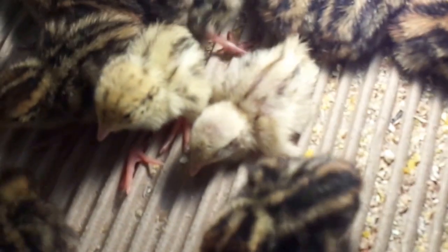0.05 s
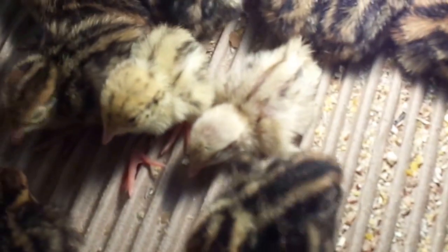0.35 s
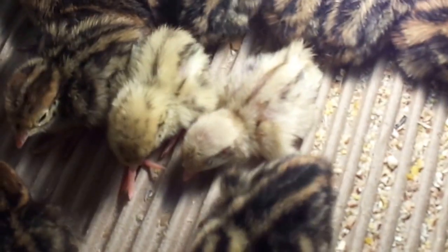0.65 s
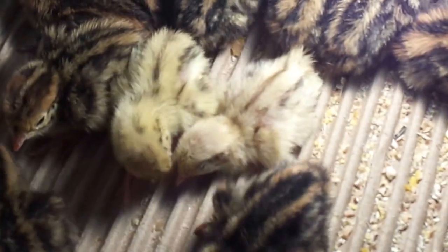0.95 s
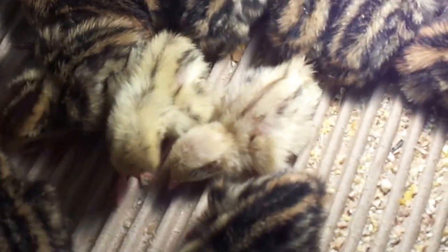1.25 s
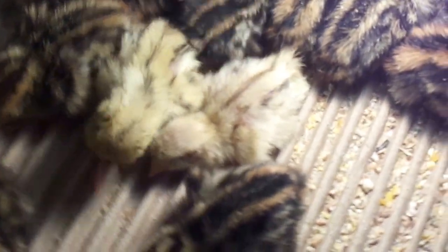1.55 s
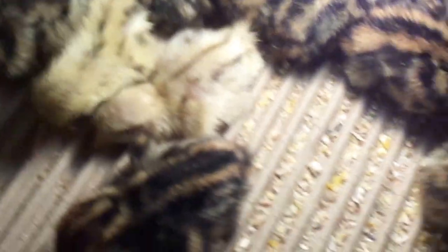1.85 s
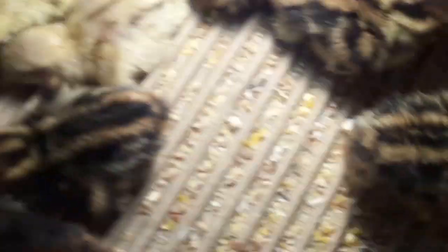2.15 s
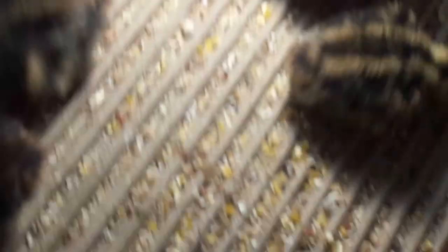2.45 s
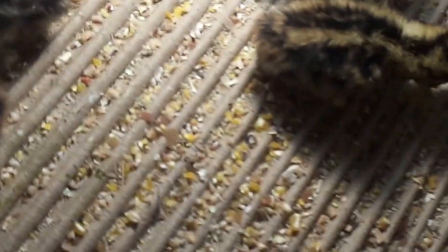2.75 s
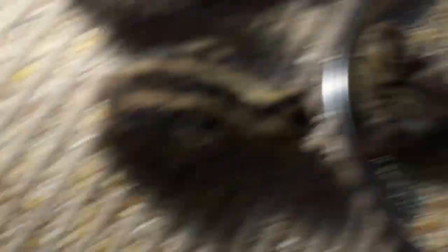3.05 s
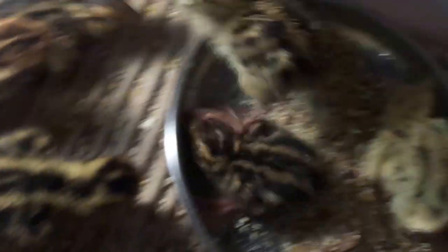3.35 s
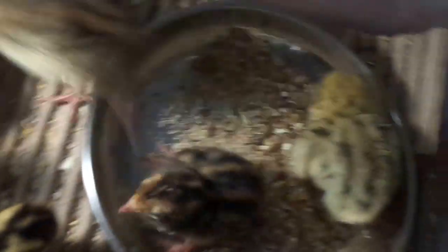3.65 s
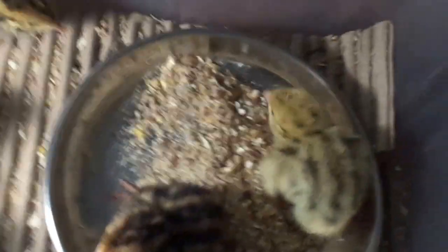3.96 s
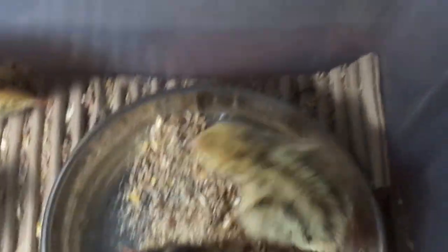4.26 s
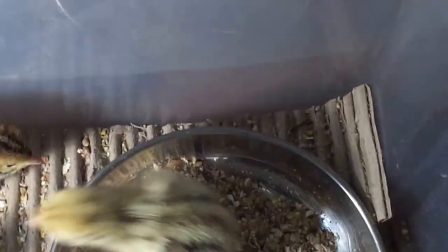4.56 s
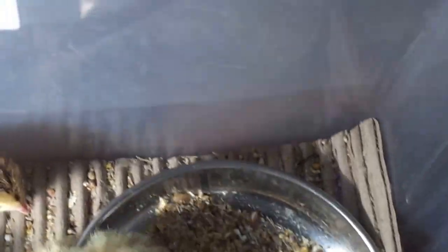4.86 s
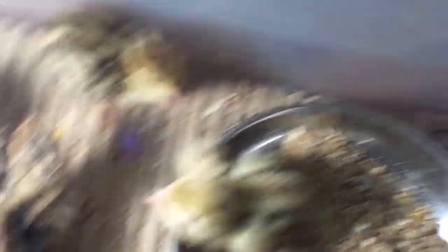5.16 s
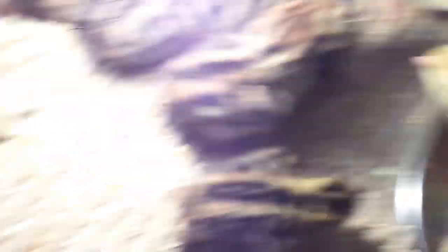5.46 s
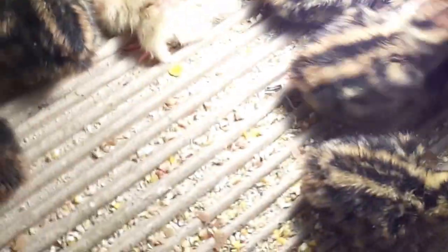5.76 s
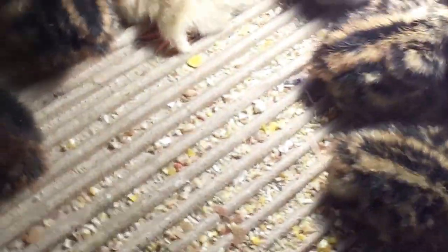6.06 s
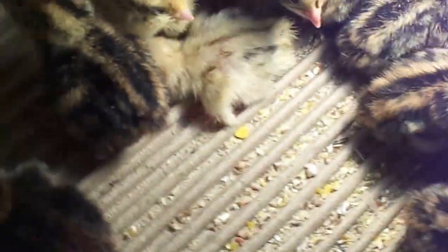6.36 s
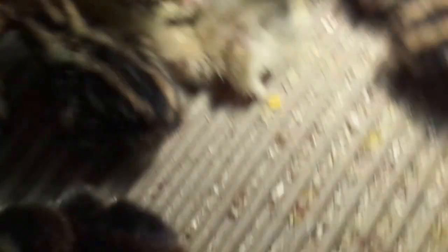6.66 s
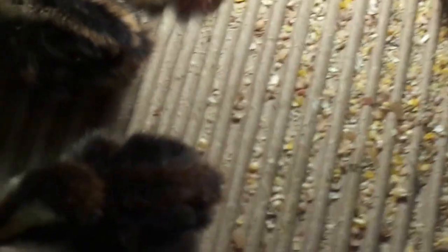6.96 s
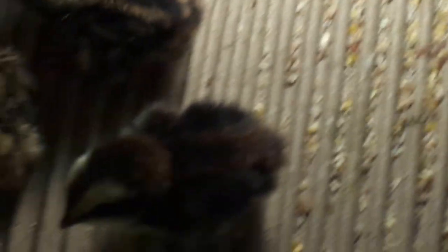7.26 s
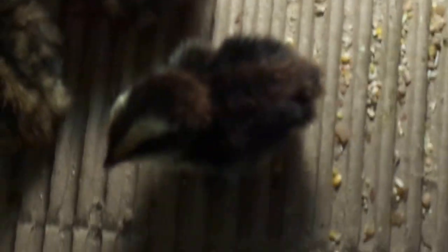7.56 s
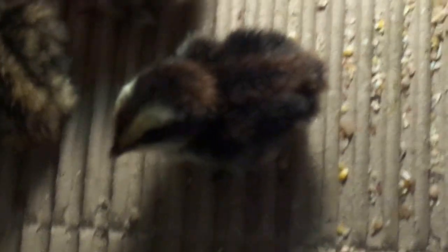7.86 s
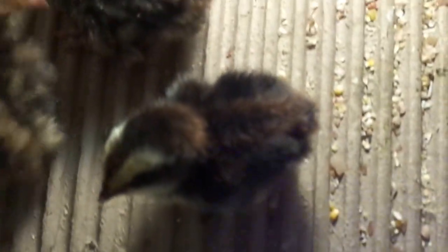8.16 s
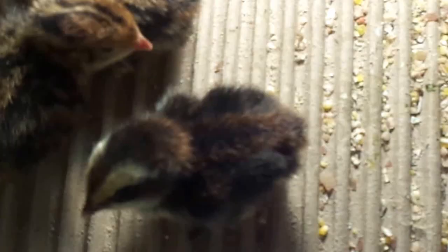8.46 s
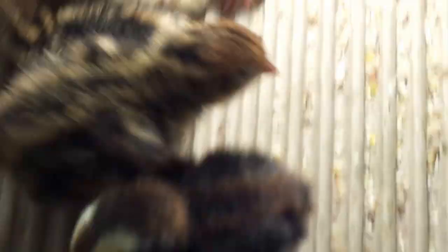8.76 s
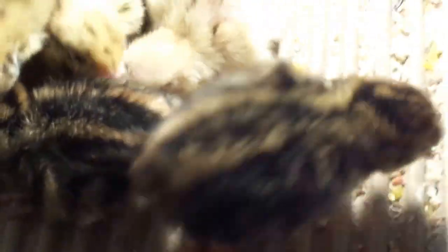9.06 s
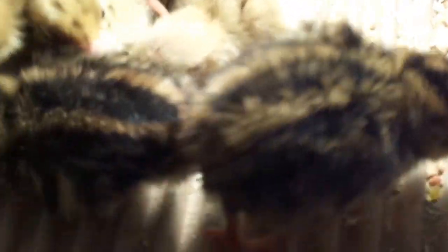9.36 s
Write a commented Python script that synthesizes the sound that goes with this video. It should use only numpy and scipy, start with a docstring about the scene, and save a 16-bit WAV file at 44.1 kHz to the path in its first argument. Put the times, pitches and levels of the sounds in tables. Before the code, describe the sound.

A close, nearly mono indoor patter of small taps and clicks comes from chicks walking and pecking on corrugated cardboard, over a dry rustle of stirred feed. They peep thinly and very quietly. A few light touches ring a metal dish about a third of the way in, then blunt bumps sound the plastic tub, and crisp beak snaps cluster in the later part. Faint hiss and a low, occasionally swelling rumble continue behind.

```python
"""Chicks feeding in a plastic tub

Tiny chicks peck and patter on corrugated cardboard strewn with feed, close up and nearly mono.
Feet thump the hollow card and scuff the grain, beaks tap and snap on seed, a steel dish rings now
and then, and blunt bumps sound the tub wall. The chicks peep and whistle very softly, over room
hiss and a low rumble that swells now and then with handling noise."""
import sys
import numpy as np
from scipy import signal
from scipy.fft import rfft, irfft, next_fast_len
from scipy.io import wavfile
from scipy.ndimage import uniform_filter1d, map_coordinates

SR = 44100
rng = np.random.default_rng(int(sys.argv[2]) if len(sys.argv) > 2 else 0)


def store_wav(level_fs):
    """Save 16-bit WAV to argv[1]."""
    pcm = np.round(np.clip(np.atleast_2d(level_fs), -1, 1) * 32767)
    wavfile.write(sys.argv[1], SR, pcm.T.astype(np.int16))


N = 414981
AGE = np.arange(5120) / SR  # seconds into one short hit
LEAD_S = .004  # a claw or beak brushes the feed this long before it lands

# Tone of the room's rumble and hiss. Each row: frequency in Hz, relative level in dB.
RUMBLE_EQ = [(15, 16), (42, -9), (60, 8), (86, 1.5), (120, -4), (200, -21), (500, -33)]
HISS_EQ = [(150, -9), (250, 7.5), (450, 4.5), (620, 3), (900, 7.5), (1500, 2), (2800, -0.5), (5000, -21),
           (9000, -20), (15000, -9)]
# Tone of scuffed card, husks and fine grit. Each row: frequency in Hz, relative level in dB.
CARD_RUB_EQ = [(76, -38), (130, -1.5), (204, 2), (464, -6.5), (601, 3.5), (709, -5), (876, -2.5),
               (1300, -8), (1690, -53), (2860, -120)]
HUSK_EQ = [(710, -49), (1200, 0.5), (1300, -2), (1530, 5), (1700, 0.5), (2450, -1.5), (2890, 0), (6200, -8),
           (8060, -11.5), (13600, -120)]
GRIT_EQ = [(3500, -5), (5000, 3), (6200, 1), (8000, 0.5), (9700, 1.5), (11900, 2), (14000, -2), (15200, -9)]
# Fader rides for the rumble, the card rub, the stirred feed, and the grit on top of the feed's ride.
# Each row: time in seconds, gain in dB.
RUMBLE_RIDE = [(0, -71), (1.25, -68), (2.9, -66), (3.9, -64), (4.1, -63), (4.45, -62), (5.3, -69),
               (5.53, -57), (5.9, -72), (6.25, -69), (6.36, -53), (6.6, -67), (7.05, -71), (7.35, -57),
               (7.8, -69), (8.08, -63), (8.25, -70), (9.41, -69)]
CARD_RUB_RIDE = [(0, -58), (2.3, -56.5), (2.5, -47.5), (3.35, -57), (3.8, -52), (4.4, -49.5), (4.9, -52),
                 (5.15, -60.5), (5.55, -56), (5.85, -56), (6.5, -58), (6.75, -47.5), (7.03, -60),
                 (7.35, -50.5), (7.55, -64), (8.2, -51), (8.75, -60), (8.9, -46), (9.22, -54.5),
                 (9.41, -45.5)]
STIR_RIDE = [(0, -50.5), (.15, -53), (.42, -56.5), (.65, -52.5), (.85, -56), (1.0, -49), (1.5, -51),
             (1.8, -52), (2.33, -53.5), (2.47, -44.5), (2.64, -54.5), (3.0, -52), (3.4, -53), (3.58, -54),
             (3.8, -49.5), (4.12, -53), (4.4, -43), (4.62, -53), (4.95, -46.5), (5.08, -55.5),
             (5.33, -51.5), (5.47, -49), (5.82, -51), (6.08, -50.5), (6.26, -51), (6.4, -45.5),
             (6.52, -54.5), (6.76, -43.5), (6.97, -54), (7.1, -52), (7.33, -48.5), (7.6, -56),
             (8.05, -53.5), (8.28, -49.5), (8.5, -48.5), (8.65, -45), (8.9, -40.5), (9.12, -50),
             (9.28, -47.5), (9.41, -46.5)]
GRIT_RIDE = [(0, -1), (1.5, -0.5), (1.8, -6), (2.42, -1), (2.75, -2.5), (4.4, -1.5), (4.9, -2.5),
             (7.0, -6.5), (7.5, -4), (8.7, -3.5), (9.41, -7)]

# Broad resonances of the hollow under the card, its skin, a beak on card and seed, feed dust under
# claws, and cracking seed. Each row: centre in Hz, width in Hz, relative level in dB.
HOLLOW_MODES = [(194, 40, 2.5), (298, 50, -2.5)]
CARD_MODES = [(626, 94, -0.096), (794, 180, -1.8), (975, 410, 0.86)]
BEAK_MODES = [(1597, 470, -4), (2190, 290, -0.5), (2770, 1400, -7), (4300, 1030, -7.5)]
GRIT_MODES = [(5570, 6600, -0.5), (10730, 2030, -2.5), (11620, 2000, 0)]
CRACK_MODES = [(6140, 2700, 1), (9540, 3100, -1)]
# Firm blows on the card. Each row: start in seconds, thump pitch in Hz and gain in dB, knock pitch in
# Hz and gain in dB, click pitch in Hz and gain in dB, crunch gain in dB, contact time in seconds.
KNOCK_CUES = [(0.052, 200.0, -42, 640.0, -44.5, 1700, -45, -64.0, 0.002),
              (0.1778, 189, -42, 1090, -31.5, 1640.0, -43, -38, 0.0032),
              (0.2344, 280.0, -36, 1020.0, -39.5, 1680.0, -43, -46.5, 0.0064),
              (0.668, 307, -40.5, 590, -43, 1640.0, -68, -64.5, 0.001),
              (0.7955, 292, -46, 1010, -41, 3240, -42.5, -40.5, 0.0024),
              (1.396, 307, -47.5, 867, -45.5, 2370, -43, -53.5, 0.0027),
              (1.5614, 182, -52.5, 604, -42.5, 1640.0, -41.0, -42.5, 0.0058),
              (1.8847, 207, -42, 790.0, -42, 4000, -45, -43, 0.0037),
              (2.2867, 275, -39.5, 1150, -45, 3880, -43, -40.5, 0.0045),
              (2.497, 275, -36.0, 1040.0, -41, 3850.0, -41, -41, 0.0052),
              (2.6947, 247, -41, 960.0, -38.5, 3590.0, -43, -39, 0.0093),
              (2.725, 275, -37, 1080, -35.5, 3760, -46, -39, 0.0032),
              (2.8337, 292, -48, 820.0, -45, 1980, -38.0, -53, 0.0046),
              (2.9727, 250.0, -43, 1050, -37.5, 3600.0, -44.5, -38, 0.0023),
              (3.016, 300.0, -48.5, 830.0, -44.5, 1900, -36.5, -51.5, 0.0066),
              (3.663, 433, -47, 930, -40.5, 4120.0, -35, -41, 0.0056),
              (3.829, 318, -42.5, 930, -39.5, 2250.0, -37.5, -46, 0.0041),
              (3.9717, 210.0, -42.0, 880.0, -40, 1640.0, -58, -53.0, 0.0043),
              (4.483, 340.0, -60.0, 670, -40.0, 1560, -42.5, -56, 0.0024),
              (5.252, 260.0, -46.0, 950, -41.5, 2470, -34.5, -55, 0.0029),
              (5.6983, 204, -40.5, 830.0, -47, 2940.0, -53.5, -60, 0.0046),
              (5.7717, 253, -44.0, 770.0, -36, 3060.0, -39.5, -51, 0.004),
              (5.799, 208, -39, 1130, -36.0, 2370, -37.5, -47, 0.003),
              (7.015, 205, -38.5, 1100, -38.5, 4260, -41.5, -42, 0.019),
              (7.27, 202, -42, 637, -37, 4300, -39.5, -39.5, 0.0059),
              (7.339, 310.0, -51.5, 643, -37.5, 2700, -37, -51, 0.0022),
              (8.1167, 219, -34, 1100.0, -30, 3600, -37.5, -43.5, 0.0054),
              (8.976, 322, -48.0, 620, -34.5, 4270.0, -43, -48, 0.0027)]
# Hard beak strikes. Each row: start in seconds, gain in dB, low and high edge of the clack in Hz,
# crack offset in dB, ring pitch in Hz, ring offset in dB, contact time in seconds.
SNAP_CUES = [(0.081, -34.5, 1570, 5130, -26, 2060, -10, 0.002),
             (0.966, -32.5, 2180, 6950, -3, 2500, -7.5, 0.0033),
             (1.495, -28.5, 1320, 2820, -18, 1630, -6, 0.00036),
             (3.754, -33, 740, 3030, -17, 870, -7, 0.0018), (4.079, -33, 550, 4470, -26, 1660, -7, 0.00089),
             (4.084, -33.5, 900, 5460, -6.5, 1120, -14, 0.0051),
             (4.3445, -27.5, 1380, 4400, -12.5, 1476, -4, 0.0032),
             (6.5875, -29.5, 1870, 5030, -14, 3050, -14, 0.0042),
             (6.612, -27, 1260, 4620, -8.5, 1474, -2, 0.0037),
             (6.784, -25, 1660, 4180, -24, 1850, -11, 0.0012),
             (6.823, -28, 1690, 5100, -5, 1760, -17, .001),
             (6.9361, -21, 1760, 4600, -5.5, 1880, -7.5, 0.00086),
             (8.212, -36, 1150, 4200, -7, 1210, -3, 0.0011),
             (8.2156, -27, 1190, 3940, -13, 2150, -6, 0.0038),
             (8.333, -28, 950, 4600, -22, 1120, -9, 0.00075),
             (8.37, -29.5, 587, 3080, -9, 1550, -6, 0.00088),
             (8.386, -26.5, 533, 3860, -17, 600, -11, 0.0013),
             (8.497, -24, 1590, 6860, -9, 4630, -9.5, 0.00073),
             (8.88, -34.5, 1700, 4930, -16, 1944, -1, .002),
             (8.979, -35, 1790, 6000, -13, 4500, -6, 0.00064)]
# What rings under a hard strike. Each row: pitch in Hz, relative level in dB, 60 dB decay in seconds.
CLACK_MODES = [(630, -3.5, 0.025), (990, 1.5, .014), (1572, -4, 0.025), (1818, -0.5, 0.013),
               (2173, -0.5, 0.016), (3005, 4.5, 0.0073), (3440, 1.5, 0.0092), (4100, 1.5, 0.011),
               (4670, 4, 0.011), (5420, 1, 0.0049)]
# Light touches on the card. Each row: start in seconds, gain in dB, weight in dB (a foot above 0,
# a beak or claw tip below), crunch offset in dB, contact time in seconds.
TAP_CUES = [(.345, -44.5, -11.5, -14, 0.0013), (0.5073, -44.5, -1.5, -6.5, 0.012),
            (.717, -54, -7, 10, .0015), (.74, -56.5, -11, 13, .0095), (.85, -53.5, 5, 6.5, .0022),
            (1.04, -53, 2, 1, .006), (1.051, -51.5, 15, -12, .0023), (1.1685, -41, -7, -22, .012),
            (1.2232, -51.5, -9, 8.5, .005), (1.3319, -47, -4, 0.5, .0083), (1.368, -51.5, -17, 7, .0055),
            (1.452, -56.5, -10, 12, .014), (1.654, -51.5, -13, -1, 0.01), (1.859, -44.5, -6.5, -8, .0058),
            (2.0462, -45, -3, -7, .0054), (2.0647, -42.5, -1.5, -10, .0053), (2.103, -49.5, -9, 3, 0.012),
            (2.136, -47, 5, -6, 0.0033), (2.343, -45, -7, -2, 0.022), (2.425, -44, -0.5, -2, .0022),
            (2.434, -42.5, -5, -13, 0.0029), (2.476, -50, -12, -9, .0033), (2.521, -43, -2, -7, 0.0018),
            (2.616, -58, 18, -14, .0026), (2.631, -47.5, -9, -17, .004), (2.877, -47.5, -9, -7, 0.0064),
            (2.948, -44.5, -9, -3, 0.0057), (3.262, -42, -4.5, -14, 0.015), (3.398, -43.5, -9, -4, .003),
            (3.486, -41, -2.5, -6, 0.0087), (3.567, -60, -5, 13, .004), (3.8945, -48, 9.5, 1, 0.0085),
            (4.0, -45, 7, 0.5, 0.0071), (4.174, -47, 2, -4, 0.0048), (4.308, -56, -4, 6, .0015),
            (4.37, -36, -7, .5, 0.0036), (4.445, -43, -5, -5, 0.0046), (4.463, -48, 0, 0, .0015),
            (4.517, -38, -6, -5, 0.0045), (4.539, -40, -4.5, -6, 0.00099), (4.7132, -43, -3, -1.5, .004),
            (4.756, -50, -11, 3, .0037), (4.827, -42.5, -5, -25, .041), (4.958, -40.5, 3, -7, 0.0046),
            (4.992, -32.5, -3.5, -17, .0091), (5.4105, -51, 12.5, 8, 0.0036), (5.46, -42.5, 0.5, -6, .0095),
            (5.577, -51.5, -11, 11.5, .015), (5.846, -52.5, -16, 0, .0018), (5.921, -51, -13, 0, .0011),
            (6.415, -41, 1, -9.5, 0.0031), (6.439, -53, 16, -15, .0046), (6.573, -41.5, 1, -4, 0.0087),
            (6.644, -42.5, 1, -7, .0029), (7.304, -42, -1, -9, 0.0017), (7.4066, -49.5, 4, 2, 0.014),
            (7.524, -59.5, 9, 12, .0055), (7.619, -54, 15.5, -15, 0.0048), (7.72, -44.5, -9, -7, 0.0036),
            (7.7996, -44, -3.5, -5, 0.008), (7.9477, -52, 9, 9, 0.0021), (8.145, -40.5, 2.5, -6, 0.0096),
            (8.317, -47.5, 8, -22, 0.0048), (8.523, -41.5, -4, -.5, 0.022), (8.558, -44.5, -8, 0, .006),
            (8.6312, -44.5, -10, -1.5, .0018), (8.651, -45, -6, -1, .0008), (8.853, -46, -4, -1, .0037),
            (8.912, -38, 3, -21, .0058), (8.954, -43.5, -5, 5, 0.013), (9.31, -44.5, -2, -8, 0.013),
            (9.383, -52, 20, -10.5, .015)]
# Lift of the hollow's lower mode as the touched spot changes. Each row: time in seconds, gain in dB.
DEPTH_RIDE = [(0, -1), (1.9, 1), (2.15, -7), (3.2, -8), (3.9, -1.5), (9.41, 6.5)]
# Beaks and feet on the dish. Each row: start in seconds, gain in dB, most excited frequency in Hz,
# roll-off away from it in dB per octave.
DISH_CUES = [(0.511, -54, 7800, 6), (2.74, -55, 2800, 10), (3.309, -47.5, 7300, 3), (3.388, -45, 3400, 11),
             (3.487, -46, 2200, 12), (3.567, -42.5, 7000, 1.5), (4.629, -52.5, 7800, 7),
             (8.749, -40, 2600, 14)]
# The dish's partials. Each row: pitch in Hz, relative level in dB, 60 dB decay in seconds.
STEEL_MODES = [(1385, -16, 2.5), (2130, -21, .8), (2804, -8, 1.4), (4344, -1, 0.2), (5930, -2, 0.14),
               (7310, -6.5, 0.3), (8600, -13, 0.15), (10450, -3, 0.091), (11900, -1, 0.065),
               (13700, -4, 0.09)]
# Arched whistles. Each row: start and length in seconds, top and end pitch in Hz, gain in dB.
WHISTLE_CUES = [(0.557, 0.066, 4560, 3160, -49), (1.438, 0.043, 3640, 3410, -49),
                (3.205, 0.068, 5540, 3680, -50.5), (3.664, 0.07, 5730, 3900, -53),
                (4.199, 0.056, 6000, 3930, -51), (5.525, 0.053, 4200, 3580, -48),
                (6.246, 0.084, 3880, 3180, -51.5), (7.203, 0.078, 5400, 4100, -45),
                (7.335, 0.08, 6140, 4800, -53), (8.528, .06, 5530, 4400, -49),
                (8.71, 0.061, 5470, 4170, -48.5)]
# A whistle's pitch bend. Each row: share of the length, share of the way from end pitch to top pitch.
WHISTLE_BEND = [(0, 0), (.15, .65), (.3, 1), (.45, 0.97), (.7, 0.41), (1, 0)]
# Contented peeps. Each row: start and length in seconds, pitch in Hz, closing upward flick as a share
# of the pitch, gain in dB.
PEEP_CUES = [(.563, 0.071, 2830, 0, -57), (1.132, 0.052, 2460, 0.11, -48), (1.693, 0.033, 2280, 0.21, -47),
             (1.946, 0.035, 2550, 0, -53), (2.068, 0.039, 2680, 0.042, -52),
             (2.187, 0.044, 2364, 0.013, -47.5), (3.023, 0.064, 2740, 0.076, -47.5),
             (3.484, 0.031, 2660, 0.38, -46), (4.18, 0.028, 2480, 0.17, -43), (4.677, 0.032, 2990, 0, -49),
             (5.005, 0.027, 2530, 0.33, -40), (5.094, 0.032, 2630, 0, -44.5),
             (5.238, 0.056, 2930, 0.17, -47), (5.382, 0.018, 2560, 0.6, -41.5),
             (5.414, 0.054, 2980, 0.016, -47), (5.677, 0.021, 2760, 0.34, -48.5),
             (5.773, 0.049, 2840, 0, -47), (5.897, 0.064, 3040, 0.025, -50.5),
             (6.653, 0.043, 2400, 0.15, -52), (8.263, 0.06, 2690, 0, -46.5),
             (8.434, .028, 2600, 0.028, -52), (8.578, 0.046, 4300, 0, -44), (9.092, 0.041, 2420, .3, -49.5)]
# Hollow bumps on the tub. Each row: start in seconds, level in dB, pitch in Hz, 60 dB decay in seconds,
# knock offset in dB.
BUMP_CUES = [(0.596, -47, 960, 0.011, -10), (1.495, -37.5, 603, 0.02, -17), (4.056, -37, 194, 0.056, -22),
             (4.066, -41, 85.5, 0.14, -21), (4.245, -44, 88, 0.058, 0.5), (4.9794, -30.5, 1040, 0.037, 0),
             (5.503, -31.5, 594, 0.03, -23), (5.505, -40.5, 1620, 0.012, -22),
             (5.563, -39, 560, 0.017, -11), (5.655, -49, 567, 0.039, -22), (6.3345, -28, 554, 0.025, 1.5),
             (6.337, -18.5, 199, 0.098, -14), (6.379, -27, 199, 0.15, -20), (6.524, -50, 580, 0.028, 4.5),
             (8.734, -38.5, 1070, 0.022, -11), (8.746, -41, 1500, 0.015, -16), (9.387, -33, 152, 0.15, -18)]


def amp(db):
    """Decibels to gain."""
    return 10 ** (np.asarray(db) / 20)


def unit(x):
    """Scale to rms 1."""
    return x / np.sqrt(np.mean(x ** 2) + 1e-20)


def burst(x):
    """Scale to the energy of 10 ms at rms 1."""
    return x * np.sqrt(SR / 100 / (np.sum(x ** 2) + 1e-20))


def fade(t60):
    """A decay of 60 dB in t60 seconds."""
    return np.exp(-np.log(1000) * AGE / max(t60, 1e-4))


def add(track, start, x):
    """Mix x into the track at start seconds."""
    i = int(np.clip(round(start * SR), 0, N - 1))
    track[i:i + len(x)] += x[:N - i]


def ride(points):
    """A fader move: one value per sample from (seconds, value) points."""
    return np.interp(np.arange(N) / SR, *np.transpose(points))


def wobble(rate):
    """A smooth random curve, rate knots a second."""
    return map_coordinates(rng.standard_normal(int(N * rate / SR) + 4), [np.arange(N) * rate / SR])


def filtered(x, response):
    """Filter x by a gain given as a function of Hz."""
    size = next_fast_len(N + 8192)
    return irfft(rfft(x, size) * response(np.fft.rfftfreq(size, 1 / SR)), size)[..., :N]


def equalised(x, eq):
    """Shape x with an EQ of (Hz, dB) points, at rms 1."""
    f, db = np.transpose(eq)
    return unit(filtered(x, lambda hz: amp(np.interp(np.log(hz + 1), np.log(f), db))))


def band(x, low_hz, high_hz):
    """Band-pass with no ringing ahead of the attack."""
    edges = [low_hz, np.clip(high_hz, 1.2 * low_hz, SR / 2 - 1)]
    return signal.sosfilt(signal.butter(3, edges, "bandpass", fs=SR, output="sos"), x)


def smear(x, t60):
    """A diffuse copy of x, spread over a short tail of decaying noise."""
    tail = rng.standard_normal(len(AGE)) * fade(t60) * (AGE > .002)
    return signal.fftconvolve(x, tail / np.linalg.norm(tail))[:N]


def room_tone():
    """Steady hiss over a low rumble that swells now and then with handling noise."""
    rumble = amp(ride(RUMBLE_RIDE) + 1.7 * wobble(4.1)) * equalised(rng.standard_normal(N), RUMBLE_EQ)
    hiss = amp(-59.5) * equalised(rng.standard_normal(N), HISS_EQ)
    return rumble + hiss


def seed_ticks(per_s, low_hz, high_hz, size_db):
    """Seeds and husks jostle: each gives a dry tick of about one cycle."""
    when, pitch, rarity = np.hsplit(rng.random((int(per_s * N / SR), 3)), 3)
    hz = low_hz * (high_hz / low_hz) ** pitch
    size = amp(-size_db * np.log(np.maximum(rarity, .03)))
    samples = np.arange(200)
    cycles = samples / SR * hz
    ticks = size * cycles * np.exp(-2 * cycles) * np.sin(2 * np.pi * cycles)
    at = (when * N).astype(int) + samples
    return unit(np.bincount(at.ravel(), ticks.ravel(), N)[:N])


def feed_patches(x, depth_db):
    """Each clump of feed has its own colour: random gain patches in time and frequency."""
    spectrum = signal.stft(x, nperseg=128)[2]
    patches = uniform_filter1d(rng.standard_normal(spectrum.shape), size=5, axis=0)
    patches = uniform_filter1d(patches, size=5, axis=1)
    return unit(signal.istft(spectrum * amp(depth_db * unit(patches)), nperseg=128)[1][:N])


def scuffing():
    """Many feet rub the card and stir the feed: clumps of tiny grains over a soft hiss."""
    stir_db = ride(STIR_RIDE)
    clumps_db = 1.87 * wobble(35) + 1.5 * wobble(190)

    def rub(eq, grains):
        """Friction noise and grains, pulsing with the shared clumps and a flutter of their own."""
        return equalised((rng.standard_normal(N) + grains) * amp(clumps_db + 1.67 * wobble(110)), eq)

    card = amp(ride(CARD_RUB_RIDE) - 1.2) * rub(CARD_RUB_EQ, grains=0)
    husk_ticks = 0.25 * seed_ticks(per_s=260, low_hz=1980, high_hz=6700, size_db=3)
    husks = amp(stir_db - 1.5) * rub(HUSK_EQ, husk_ticks)
    grit_ticks = 0.5 * seed_ticks(per_s=380, low_hz=3750, high_hz=15200, size_db=3)
    grit = amp(stir_db + ride(GRIT_RIDE)) * feed_patches(rub(GRIT_EQ, grit_ticks), depth_db=2.4)
    return card + husks + grit


def contact(length, strike, lumps_db, brush_db):
    """The force of one touch: a light brush, the strike, then grains slipping in uneven clumps."""
    t = AGE - LEAD_S
    knots = rng.standard_normal(256)
    clumps = amp(lumps_db * np.interp(np.arange(len(AGE)) / 72, np.arange(256), knots))
    press = np.exp(-np.abs(t) / (1.2 * length)) * (t > 0)
    brush = amp(brush_db) * np.exp(-np.abs(t) / .003)
    slip = rng.standard_normal(len(AGE)) * clumps * (press + brush)
    force = slip / np.linalg.norm(slip)
    force[int(LEAD_S * SR) + 8] += strike * np.exp(-length / 0.0018)  # shorter touch, harder attack
    return force


def resonate(force, modes, spread, skirt):
    """A force rings broad modes that shift with the spot struck; a smaller skirt trims their flanks."""
    f = np.fft.rfftfreq(len(AGE), 1 / SR)
    body = 0
    for k, (hz, width, db) in enumerate(modes):
        shift, gain = rng.standard_normal(2)
        hz = hz * np.exp(spread * shift)
        peak = lambda w: 1j * f * w / (hz * hz - f * f + 1j * f * w)
        body = body + (-1) ** k * amp(db + 2 * gain) * peak(width) * peak(skirt * hz)
    return burst(irfft(rfft(force) * body))


def card_knocks():
    """A firm blow rings the hollow, the card's skin and the beak or claw, and crunches feed."""
    out = np.zeros(N)
    for cue in KNOCK_CUES:
        start, thump_hz, thump_db, knock_hz, knock_db, click_hz, click_db, crunch_db, length = cue
        force = contact(length, strike=3.5, lumps_db=3.5, brush_db=-14.5)
        slip = contact(length, strike=0.41, lumps_db=1.5, brush_db=-10)
        thump = resonate(force, [(thump_hz, 63, 0)], spread=0.012, skirt=0.9)
        knock = resonate(force, [(knock_hz, 260, 8)] + CARD_MODES[:1], spread=0.025, skirt=1.0)
        click = resonate(slip, [(click_hz, 580, 4)] + BEAK_MODES[2:], spread=0.023, skirt=1.0)
        crunch = resonate(slip, GRIT_MODES, spread=0.076, skirt=1.0)
        body = amp(thump_db) * thump + amp(knock_db) * knock
        bite = amp(click_db) * click + amp(crunch_db - 1) * crunch
        add(out, start - LEAD_S, body + bite)
    return out


def beak_snaps():
    """A hard strike on seed: a crack, a dry clack coloured by the spot, and a ring that outlasts them."""
    out = np.zeros(N)
    for start, db, low_hz, high_hz, crack_db, ring_hz, ring_db, length in SNAP_CUES:
        force = contact(max(length, .0005), strike=1.3, lumps_db=4, brush_db=-27)
        modes = 0
        for hz, level, t60 in CLACK_MODES:
            gain, shift = rng.standard_normal(2)
            tone = np.sin(2 * np.pi * hz * (1 + 0.023 * shift) * AGE)
            modes += amp(level + 2 * gain) * tone * fade(t60)
        dense_modes = rng.standard_normal(len(AGE)) * fade(0.015)  # the many weaker ones in between
        body = band(burst(modes) + amp(4) * burst(dense_modes), low_hz, high_hz)
        clack = burst(signal.fftconvolve(force, body)[:len(AGE)])
        crack = amp(crack_db) * resonate(force, CRACK_MODES, spread=0.022, skirt=0.66)
        card = amp(-18) * resonate(force, CARD_MODES, spread=0.072, skirt=1.4)
        ring = np.sin(2 * np.pi * ring_hz * AGE) * fade(t60=0.039) * (1 - fade(7 * length))
        add(out, start - LEAD_S, amp(db) * (clack + crack + card))
        add(out, start, amp(db + ring_db - 1) * burst(ring))
    return out


def faint_tap_cues(per_s):
    """The flock's faint touches as tap cues: randomly timed, stronger while the feed is stirred."""
    count = int(per_s * N / SR)
    starts = rng.random(count) * N / SR
    levels = np.interp(starts, *np.transpose(STIR_RIDE)) - 6.5
    weight_db, crunch_db, contact_s = -10.5, 5, 0.005
    return [(start, db + 4.5 * size, weight_db + 2 * heft, crunch_db, contact_s)
            for start, db, (size, heft) in zip(starts, levels, rng.standard_normal((count, 2)))]


def card_taps():
    """A light touch thumps, knocks, clicks and crunches; more weight means more thump, less click."""
    out = np.zeros(N)
    (low_hz, low_width, low_db), upper_mode = HOLLOW_MODES
    for start, db, weight_db, crunch_db, length in TAP_CUES + faint_tap_cues(per_s=4):
        force = contact(length, strike=0.64, lumps_db=4, brush_db=-0.5)
        slip = contact(length, strike=0.14, lumps_db=2, brush_db=-9.5)
        depth_db = np.interp(start, *np.transpose(DEPTH_RIDE))
        hollow = [(low_hz, low_width, low_db + depth_db), upper_mode]
        thump = amp(-4 + 0.95 * weight_db) * resonate(force, hollow, spread=0.03, skirt=1.6)
        knock = amp(-0.15 + 0.43 * weight_db) * resonate(force, CARD_MODES, spread=0.11, skirt=1.0)
        click = amp(-0.28 - 0.49 * weight_db) * resonate(force, BEAK_MODES, spread=0.12, skirt=0.39)
        crunch = amp(crunch_db + 3.1) * resonate(slip, GRIT_MODES, spread=0.04, skirt=0.88)
        add(out, start - LEAD_S, amp(db) * (knock + click + crunch))
        add(out, start - LEAD_S + .001, amp(db) * thump)
    return out


def steel_dish():
    """The dish rings thinly in beating pairs of modes; each touch favours its own range of them."""
    out, t = np.zeros(N), np.arange(SR) / SR
    for start, db, centre_hz, rolloff_db in DISH_CUES:
        scatter = rng.standard_normal((len(STEEL_MODES), 3))
        for (hz, level, t60), (gain, split, phase) in zip(STEEL_MODES, scatter):
            twin_hz = hz * (1 + 0.0055 * split)
            pair = np.sin(2 * np.pi * hz * t) + 1.34 * np.sin(2 * np.pi * twin_hz * t + np.pi * phase)
            off_centre_db = rolloff_db * abs(np.log2(hz / centre_hz))
            envelope = amp(db + level + 2 * gain - off_centre_db) * np.exp(-np.log(1000) * t / t60)
            chatter = amp(2 * wobble(110)[:len(t)])  # loose feed on the steel
            add(out, start, envelope * pair * chatter)
    return out


def chirp(hz, waver, overtone_db, late):
    """A thin, slightly husky note on a pitch path; late > 1 moves its swell towards the end."""
    progress = np.linspace(0, 1, len(hz))
    jitter, shimmer = (np.interp(progress, np.linspace(0, 1, 60), knots)
                       for knots in rng.standard_normal((2, 60)))
    phase = 2 * np.pi * np.cumsum(hz * (1 + waver * jitter)) / SR
    envelope = np.abs(np.sin(np.pi * progress ** late)) ** 0.3 * amp(3 * shimmer)
    return unit((np.sin(phase) + amp(overtone_db) * np.sin(2 * phase)) * envelope)


def chick_calls():
    """Whistles arch up and sink; peeps sag gently, and some flick upward as they end."""
    out = np.zeros(N)
    for start, length, top_hz, end_hz, db in WHISTLE_CUES:
        progress = np.linspace(0, 1, int(length * SR))
        pitch = end_hz + (top_hz - end_hz) * np.interp(progress, *np.transpose(WHISTLE_BEND))
        add(out, start, amp(db - 1.5) * chirp(pitch, waver=0.016, overtone_db=-34, late=1.2))
    sag_per_s = 2.38  # as a share of the pitch
    for start, length, hz, flick, db in PEEP_CUES:
        progress = np.linspace(0, 1, int(length * SR))
        pitch = hz * (1 - sag_per_s * length * (progress - .5) + flick * progress ** 4)
        add(out, start, amp(db - 3) * chirp(pitch, waver=0.019, overtone_db=-25, late=1.5))
    return out


def tub_bumps():
    """Blunt touches push the wall of the tub and sound mainly one of its modes."""
    out = np.zeros(N)
    low_cut_hz = 148  # the wall radiates little below this
    for start, db, hz, t60, knock_db in BUMP_CUES:
        mode = np.sin(2 * np.pi * hz * AGE) * fade(t60)
        boom = burst(band(mode, min(low_cut_hz, 0.93 * hz), 3 * hz))
        force = contact(0.00093, strike=2.5, lumps_db=-22, brush_db=-52)
        knock = resonate(force, CARD_MODES + BEAK_MODES[:2], spread=0.12, skirt=3.5)
        add(out, start, amp(db) * boom)
        add(out, start - LEAD_S, amp(db + knock_db) * knock)
    return out


def scene():
    """Everything sits in the centre; a very faint, smeared copy of the mix adds a trace of width."""
    send = card_taps() + tub_bumps() + steel_dish() + chick_calls()
    room = room_tone()
    reverb = amp(-6.5) * smear(send, t60=0.056)  # the short answer of the tub's near walls
    mid = send + reverb + card_knocks() + beak_snaps() + scuffing() + room
    side = amp(-42) * smear(mid, t60=0.002)
    return np.array([mid + side, mid - side])


def record(dry):
    """A very steep high cut takes the top off the mix."""
    high_cut_hz = 15150
    return filtered(dry, lambda hz: 1 / np.sqrt(1 + (hz / high_cut_hz) ** 160))


dry = scene()
out = record(dry)
store_wav(out)
```